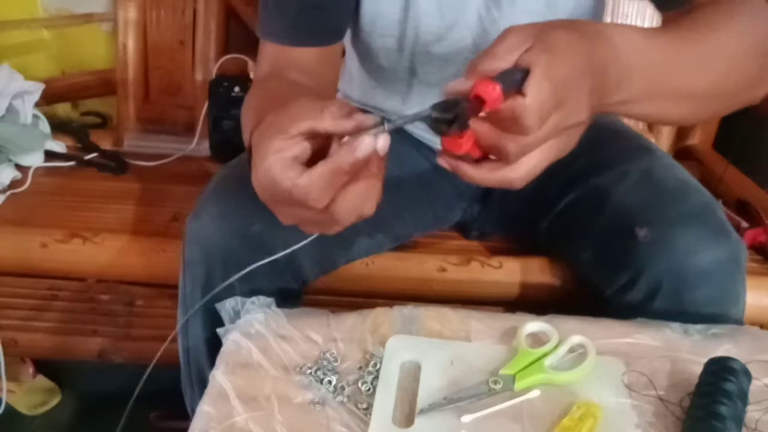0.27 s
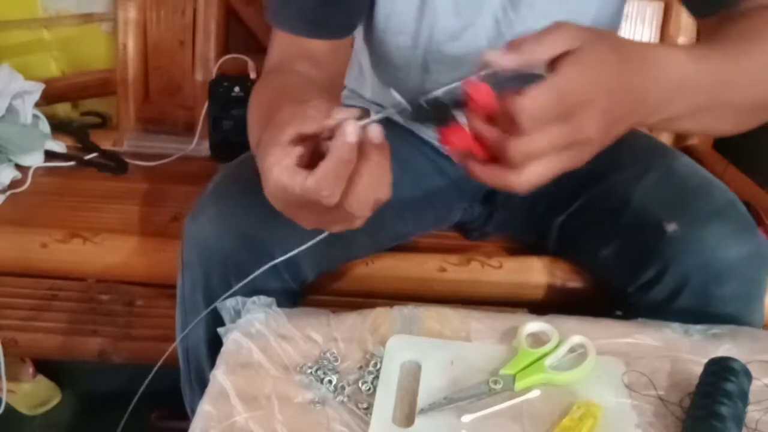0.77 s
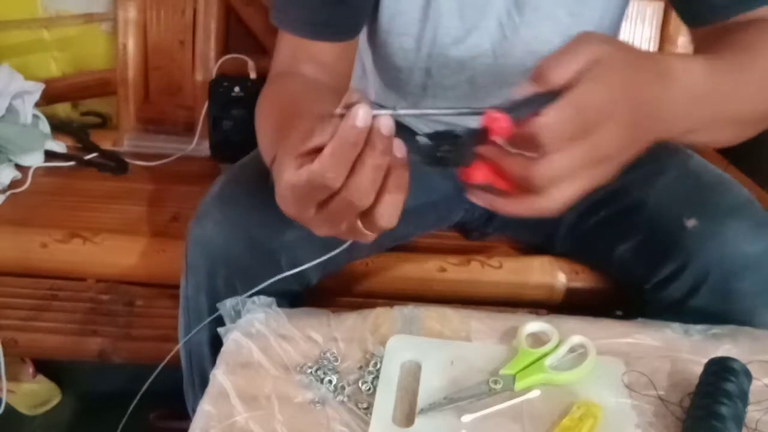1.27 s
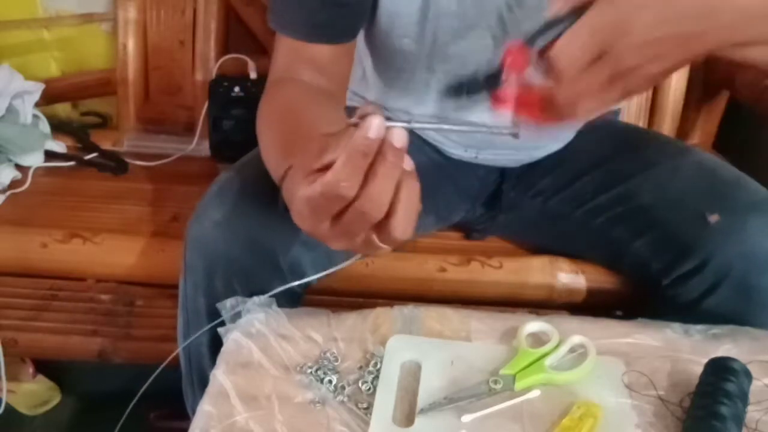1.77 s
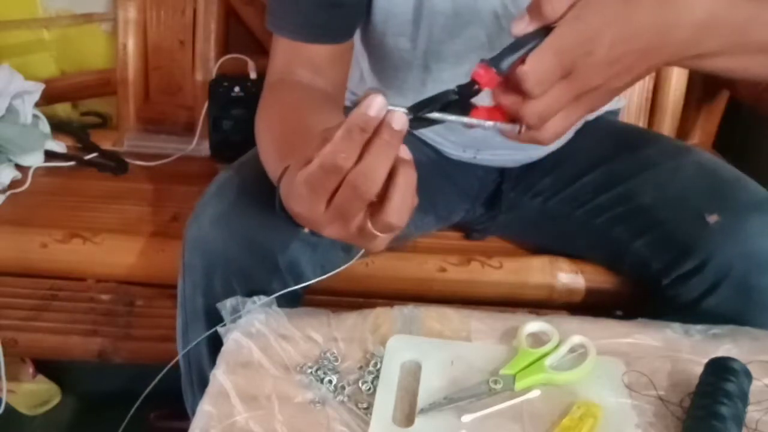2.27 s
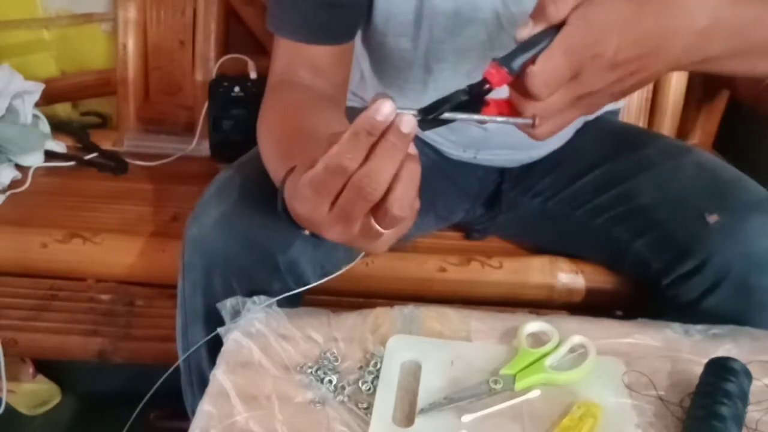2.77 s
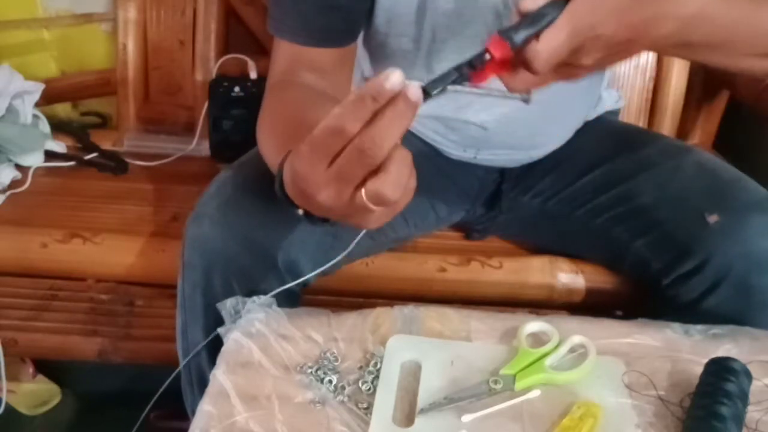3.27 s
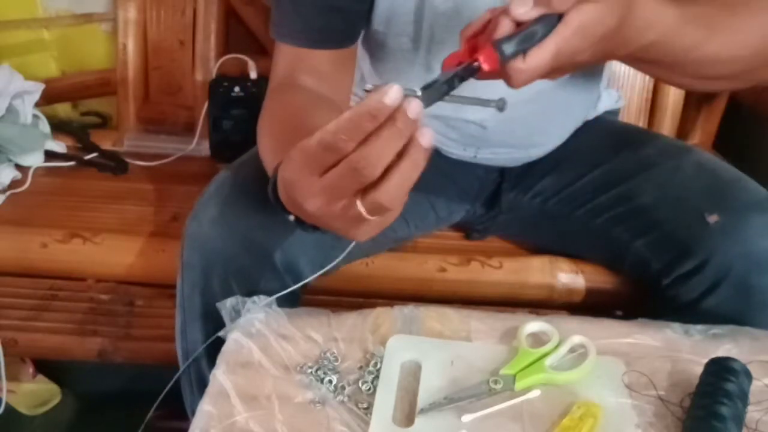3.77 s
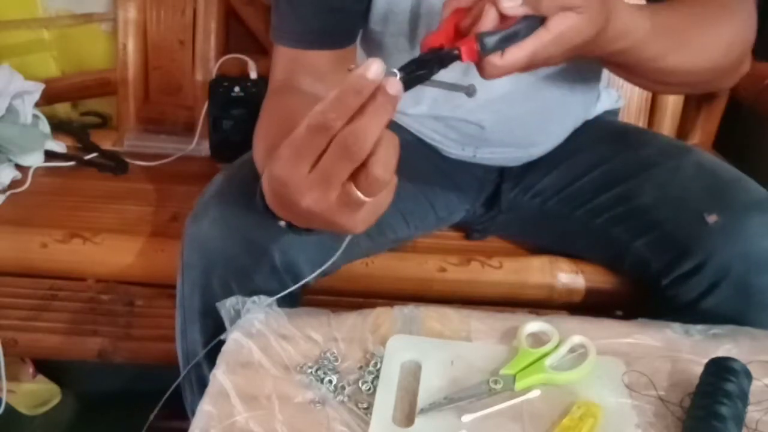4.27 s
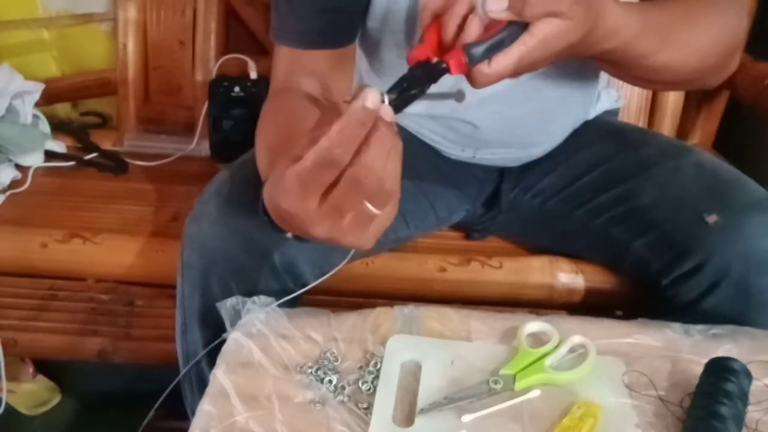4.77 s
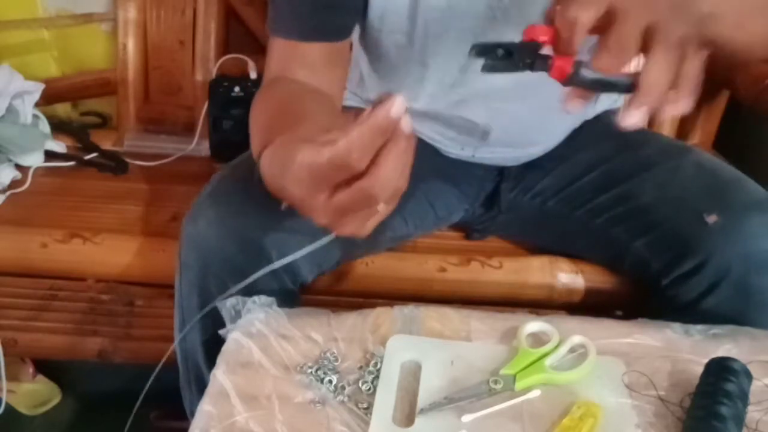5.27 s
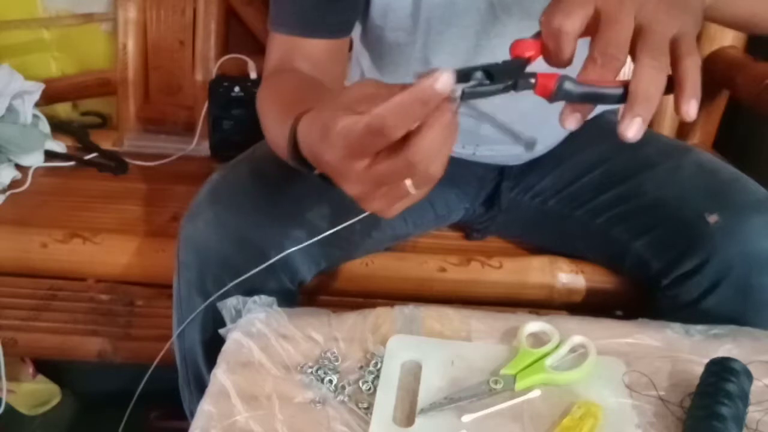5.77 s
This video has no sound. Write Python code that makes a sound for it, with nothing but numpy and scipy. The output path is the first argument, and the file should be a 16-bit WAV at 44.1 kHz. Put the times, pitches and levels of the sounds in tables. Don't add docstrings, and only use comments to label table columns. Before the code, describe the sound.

Hand work with pliers, wire and a nail, heard close on a small mono microphone in a sheltered outdoor spot. Airy hiss never stops. Eight distant blows on wood, soft and hard, share the same short boxy echo and stop after two thirds. A bright jaw snap comes early, single hard ticks follow irregularly, a bench thuds low in the middle, and light clicks with high scratchy scrapes finish.

```python
import sys
import numpy as np
from scipy import signal
from scipy.io import wavfile
from scipy.ndimage import uniform_filter1d

SR = 44100
rng = np.random.default_rng(int(sys.argv[2]) if len(sys.argv) > 2 else 0)


def unload_wav(signal):
    wavfile.write(
        sys.argv[1],
        SR,
        np.round(np.clip(np.atleast_2d(signal).T, -1, 1) * 32767).astype(np.int16),
    )


def ratio(d):
    e = np.asarray(d, float) / 20
    return 10 ** e


N = 264644


def read(points, at):
    x, value = np.transpose(points)
    return np.interp(np.log(at + 1), np.log(x + 1), value)


def evened(x):
    return x / np.sqrt(np.mean(x ** 2) + 1e-20)


def smooth_noise(length, size):
    return evened(uniform_filter1d(rng.standard_normal(length), size=size))


def add(mix, s, sound):
    part = mix[round(s * SR):][:len(sound)]
    part += sound[:len(part)]


def port(hz):
    # (frequency [Hz], level [dB])
    port_points = [(500, -22.5), (850, -16), (1110, -11.5), (1240, -0.5), (1400, -6.5), (1650, -11.5),
                   (3650, -11.5), (5000, -12.5), (6100, -7), (7400, -9.5), (8620, -24.5), (13700, -43),
                   (14600, -30.5), (15400, -24.5)]
    dip = -9 / (1 + (2 * (hz - 6590) / 380) ** 2)
    return read(port_points, hz) + dip


def causal(x, colour):
    hz = abs(np.fft.fftfreq(4096, 1 / SR))
    log_gain = np.log(ratio(np.maximum(colour(hz), -110)))
    phase = -signal.hilbert(log_gain).imag
    taps = np.fft.ifft(np.exp(log_gain + 1j * phase)).real[:2048]
    return signal.oaconvolve(x, taps)[:len(x)]


def heard(x, colour):
    return causal(x, lambda hz: colour(hz) + port(hz))


def hump(centre_hz, spread):
    return lambda hz: np.maximum(-6 * (np.log2((hz + 1) / centre_hz) / spread) ** 2, -40)


def hiss(patchy_db=2.0, flicker_db=0.22, hollow_db=-0.5):
    # (frequency [Hz], level [dB])
    air = [(20, -49), (35, -27), (55, 2.5), (85, 5), (150, 4.5), (240, 0.5), (340, 0.5), (480, 5.5),
           (720, -5), (900, 1), (2000, -2), (16000, -5.5)]
    # (frequency [Hz], width [Hz], level [dB])
    hollows = [(101, 92, -3), (233, 9.1, 9), (301.5, 6.2, 0.5), (520, 3.9, -10), (624, 15, 5.5),
               (807, 49, -3), (978, 17, 1)]
    # (time [s], level [dB])
    drift = [(0.0, -41), (1.03, -41.5), (1.4, -40.5), (2.66, -41.5), (3.64, -40.5), (4.2, -41.2),
             (5.35, -41.5), (6.0, -41)]
    rumble_db, rumble_drift_db_per_s = 3, 0.16

    frames, hz = N // 512 + 6, np.fft.rfftfreq(2048, 1 / SR)
    real, imaginary, patches, slow = rng.standard_normal((frames, len(hz), 4)).T
    patches = uniform_filter1d(patches, size=9, axis=0)
    patches = evened(uniform_filter1d(patches, size=7, axis=1))
    slow = evened(uniform_filter1d(slow, size=14, axis=1))

    frame_s = np.arange(frames) * 512 / SR
    rumble = (rumble_db + rumble_drift_db_per_s * frame_s) / (1 + (hz[:, None] / 800) ** 4)
    field = ratio((read(air, hz) + port(hz))[:, None] + rumble + patchy_db * patches)
    for k, (centre_hz, width_hz, db) in enumerate(hollows):
        away = 2 * (hz[:, None] - centre_hz) / width_hz
        field = field * (1 + ratio(db + hollow_db * slow[k]) / (1 + away ** 2))
    spectra = (real + 1j * imaginary) * field
    noise = evened(signal.istft(spectra, nperseg=2048, noverlap=1536)[1][:N])

    s, level_db = np.transpose(drift)
    level_db = np.interp(np.arange(N) / SR, s, level_db)
    return noise * ratio(level_db + flicker_db * smooth_noise(N, 500))


def echo_density(t):
    early_db = -50 * np.maximum(1 - t / 0.0083, 0)
    crowd_db = 5 * np.exp(-((t - 0.03) / 0.0066) ** 2)
    dying = ratio(-176 * np.maximum(t - 0.055, 0))
    faint_tail = ratio(-23 - 40 * t)
    return ratio(early_db + crowd_db - 4.0) * (dying + faint_tail)


def pounding(ring_db=-3.5, fresh=0.38, uneven_db=-2.0, knock_db=-6.5):
    # (time [s], peak [dB], crack [dB], sizzle [dB])
    blows = [
        (0.3494, -25, 11, 8),
        (1.287, -22.5, 6, 10.5),
        (1.8230, -18, 13.5, 4),
        (2.2957, -23, 16.5, 10),
        (2.7600, -18, 9.5, 15.5),
        (3.2235, -25, 10, 15),
        (3.6484, -22.5, 5.5, 11),
        (4.1010, -22.5, 10, 10),
    ]
    # (frequency [Hz], level [dB])
    blow_colour = [(40, -31), (80, 6), (170, 1.5), (400, 10), (700, 8.5), (870, 4.5), (1050, 4), (1300, -1),
                   (2200, -11), (3500, -22), (6000, -25.5), (16000, -34)]
    # (frequency [Hz], level [dB], time to fall 60 dB [s])
    wood_modes = [(169.9, -8.5, 0.82), (422, -8.5, 0.54), (601.0, -11.5, 0.99), (875.0, -5.5, 0.9),
                  (836, -2, 0.85), (977, 5.0, 0.16), (1080, -24.0, 1.2), (1181, 6, 0.053),
                  (1236.0, -12.5, 0.97), (1325, -6, 0.07), (1375, -3.0, 0.088), (1462, -8.5, 0.42),
                  (1561, -5.5, 1.0), (1787, 0.5, 0.11), (1852, -28, 0.62), (2236, -22.5, 5.0),
                  (2290, -46.0, 1.7), (2495, -54, 0.09), (92.0, -13.5, 0.35), (123, -8.0, 0.12),
                  (227.6, -2.5, 0.21), (284.7, -7.5, 0.56)]
    # (delay [s], level [dB])
    wall_echoes = [(.0035, 4), (.0065, 7.5), (.0088, 4), (.0105, 12), (.0150, 4), (.0175, 16), (.0265, 13),
                   (.0365, 11), (.0460, 7)]
    # (frequency [Hz], level [dB], time to fall 60 dB [s])
    knock_modes = [(217, 1, 0.024), (600, -16, 0.053), (887, 2, 0.024), (1227, -0.5, 0.077),
                   (1695, -23.5, 0.058)]
    # (delay [s], frequency [Hz], level [dB], time to fall 60 dB [s])
    forerun = (0.00306, 880, 12.4, .045)
    usual_blow_db, peak_to_mean_db, longest_ring_s = -22, -20.5, 0.36

    t = np.arange(int(.4 * SR)) / SR
    density = echo_density(t)
    ring = np.zeros(len(t))
    for hz, db, t60 in wood_modes:
        fade = ratio(db - 60 * t / np.clip(t60, .1, longest_ring_s))
        ring += fade * np.sin(2 * np.pi * (hz * t + rng.random()))
    ring = ring * np.maximum.accumulate(density)
    path = rng.standard_normal(len(t)) * ratio(uneven_db * smooth_noise(len(t), 40))

    walls = np.zeros(len(t))
    for k, (s, db) in enumerate(wall_echoes):
        add(walls, s, [(-1) ** k * ratio(db)])
    knock = sum(ratio(db - 60 * t / t60) * np.sin(2 * np.pi * hz * t) for hz, db, t60 in knock_modes)
    knocks = ratio(knock_db) * evened(signal.oaconvolve(walls, knock)[:len(t)])
    s, hz, db, t60 = forerun
    soft_start = 1 - np.exp(-t / .0006)
    add(knocks, s, ratio(db - 60 * t / t60) * soft_start * np.sin(2 * np.pi * hz * t))

    out = np.zeros(N)
    for s, db, crack_db, sizzle_db in blows:
        boom_db = 1.3 - 0.87 * (db - usual_blow_db)
        hardness = [(30, -49), (90, boom_db), (250, boom_db), (800, 0.5), (1500, 1.5),
                    (2500, crack_db), (4200, crack_db), (6000, sizzle_db), (11000, 11.5)]
        echoes = (path + fresh * rng.standard_normal(len(t))) * density + walls
        echoes = heard(echoes, lambda hz: read(blow_colour, hz))
        body = evened(echoes) + ratio(ring_db) * evened(ring) + knocks
        blow = causal(body, lambda hz: read(hardness, hz))
        add(out, s, ratio(db + peak_to_mean_db) * blow)
    return out


def scrapes(slips_per_s=12000.0):
    # (time [s], level [dB], centre [Hz], spread [octaves], length [s])
    strokes = [(.47, -48.5, 10000, 0.71, 0.058), (1.373, -54, 10500, 0.28, .03),
               (3.228, -53.5, 11100, 0.31, 0.06), (3.446, -41, 217, 1.02, 0.16),
               (3.5, -49.5, 544, 0.27, 0.13), (4.231, -44.5, 8800, 0.65, 0.059),
               (4.26, -46, 14000, 0.45, .04), (4.701, -43, 14500, .45, .03),
               (4.945, -47, 9500, 0.52, 0.048), (5.825, -46, 15000, .15, .012),
               (5.833, -40, 14800, 0.3, .03)]
    out, t = np.zeros(N), np.arange(SR // 2) / SR
    for s, db, hz, spread, length in strokes:
        slips = rng.standard_normal(len(t)) * (rng.random(len(t)) < slips_per_s / SR)
        stroke = (1 - np.exp(-t / 0.001)) * np.exp(-(t / length) ** 1.3)
        add(out, s, ratio(db) * evened(heard(slips, hump(hz, spread))) * stroke)
    return out


def echo_tail():
    # (frequency [Hz], time to fall 60 dB [s])
    echo_times = [(500, 0.34), (3000, 0.43), (8000, 0.19), (15000, 0.79)]
    hz, t, z = signal.stft(rng.standard_normal(SR // 3), SR, nperseg=256)
    fading = z * ratio(-60 * t / read(echo_times, hz)[:, None])
    tail = signal.istft(fading, SR, nperseg=256)[1][:SR // 3]
    return tail * (1 - np.exp(-np.arange(len(tail)) / SR / 0.0018))


def ticks():
    # (centre [Hz], peak [dB], spread [octaves], ring [s], echo [dB])
    jaws = [
        (328, -38, 0.94, .084, 0.5),
        (853, -25.5, 0.35, .026, -3),
        (3640, -24, 0.18, 0.0082, -11),
        (3900, -21, 1, 0.013, -3),
        (5620, -10.5, 0.69, 0.0024, -11.5),
        (12200, -21.5, 0.43, 0.007, -22),
    ]
    # (time [s], peak [dB], centre [Hz], spread [octaves])
    small_ticks = [(.916, -41, 8000, .8), (1.067, -40, 9000, 1.1), (1.495, -38, 8000, 0.49),
                   (1.858, -17.5, 5400, 1.1), (2.691, -39, 8000, .8), (2.769, -24, 5840, 0.31),
                   (2.928, -36, 8700, .7), (4.6992, -15, 7040, 0.33), (4.698, -28, 11600, .4),
                   (4.7035, -28, 7000, .4), (4.7132, -31, 7300, 0.39), (5.106, -31.5, 7950, .3),
                   (5.34, -40, 9000, .3), (5.577, -38, 7650, .3), (5.754, -31, 7400, .4),
                   (5.823, -28.5, 7900, .3)]
    cut_s = .6546
    lag_cycles = 1.9
    faint_tick_db = -40

    parts = [(cut_s + lag_cycles / hz, db, hz, spread, ring, echo_db) for hz, db, spread, ring, echo_db in jaws]
    for s, db, hz, spread in small_ticks:
        strength_db = db - faint_tick_db
        parts.append((s, db, hz, spread, 0.019 * np.exp(-0.3 * strength_db), -10 - 0.3 * strength_db))

    out, t = np.zeros(N), np.arange(SR // 3) / SR
    for s, db, hz, spread, ring, echo_db in parts:
        rattle = np.sign(rng.standard_normal(len(t))) * ratio(-20 * t / ring)
        snap = heard(rattle, hump(hz, spread))
        echo = heard(echo_tail(), hump(hz, 1.19 * spread))
        add(out, s, ratio(db) * (snap / abs(snap).max() + ratio(echo_db) * echo / abs(echo).max()))
    return out


def bumps(wobble=.4):
    # (time [s], level [dB], frequency [Hz], time to fall 60 dB [s])
    dull_bumps = [(1.955, -44.5, 600, 0.24), (2.629, -43, 86, 0.28), (2.86, -48.5, 302, 0.54),
                  (2.86, -47, 634, .2), (3.17, -49, 448, 0.72), (5.29, -58, 616, 0.95),
                  (5.69, -47, 520, 0.58), (5.77, -49.5, 298, .88), (5.784, -37.5, 1228, 0.22),
                  (4.29, -51, 450, 0.56), (4.55, -48, 246, 0.32), (5.07, -50, 292, 0.35)]
    # (frequency [Hz], level [dB], delay [s], time to fall 60 dB [s])
    bench_modes = [(52.6, -42, .035, 0.59), (76.6, -35, 0.06, 0.36), (124.3, -41, 0.036, 0.6),
                   (174.5, -37.5, .035, .6), (232, -38, 0.031, 0.21), (412.5, -33, 0, 0.4),
                   (526, -49, .083, .3)]
    shove_s, shove_rise_s = 3.442, 0.0081
    bump_rise_s, rise_cycles = .028, 7

    swings = [(shove_s + delay, db, hz, t60, shove_rise_s) for hz, db, delay, t60 in bench_modes]
    for s, db, hz, t60 in dull_bumps:
        swings.append((s, db, hz, t60, min(bump_rise_s, rise_cycles / hz)))

    out, t = np.zeros(N), np.arange(SR // 2) / SR
    for s, db, hz, t60, rise in swings:
        uneven = 1 + wobble * smooth_noise(len(t), 600)
        swell = 1 - np.exp(-(t / rise) ** 2)
        fade = np.sqrt(2) * ratio(db - 60 * t / t60)
        add(out, s, fade * swell * uneven * np.sin(2 * np.pi * hz * t))
    return out


def scene():
    return np.tile(hiss() + pounding() + scrapes() + ticks() + bumps(), (2, 1))


def low_pass(x):
    return signal.sosfilt(signal.butter(12, 16810, fs=SR, output="sos"), x)


def record(dry, stray_db=-70.5, patchy_db=7.5, bass_hz=43.0):
    # (frequency [Hz], level [dB])
    stray_colour = [(50, -1.5), (300, 1), (1000, -6), (2500, -8), (3400, -10.5), (4000, 14), (4700, -12.5),
                    (8000, -27), (13500, -39), (15200, -4.5)]
    noises = rng.standard_normal(dry.shape)
    stray = np.array([causal(noise, lambda hz: read(stray_colour, hz)) for noise in noises])
    stray = evened(stray) * ratio(stray_db + patchy_db * smooth_noise(N, 2500))
    thinned = signal.lfilter(*signal.butter(2, bass_hz, "high", fs=SR), dry)
    limit = signal.firwin(801, 15540, window=("kaiser", 9), fs=SR)
    mix = signal.oaconvolve(thinned + stray, limit[None], "same") - .0003
    return low_pass(mix)


dry = scene()
out = record(dry)
unload_wav(out)
```